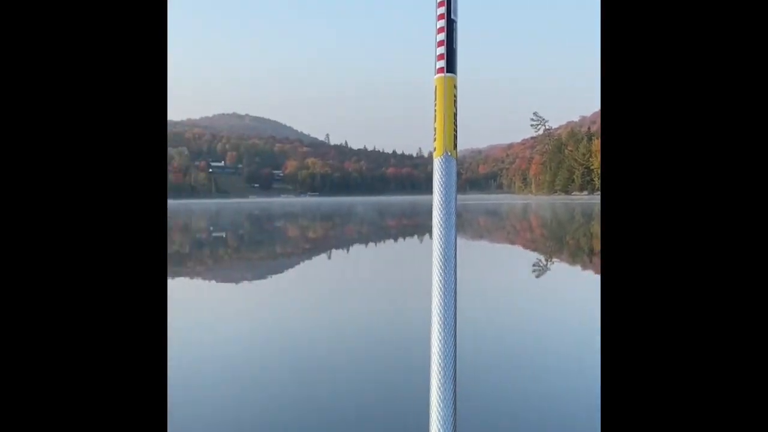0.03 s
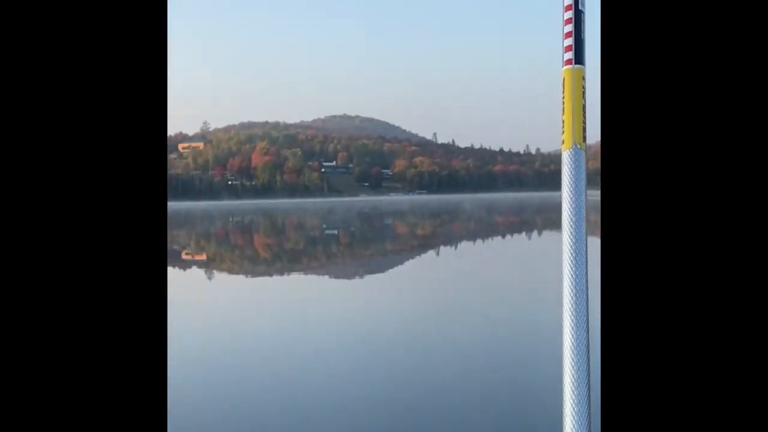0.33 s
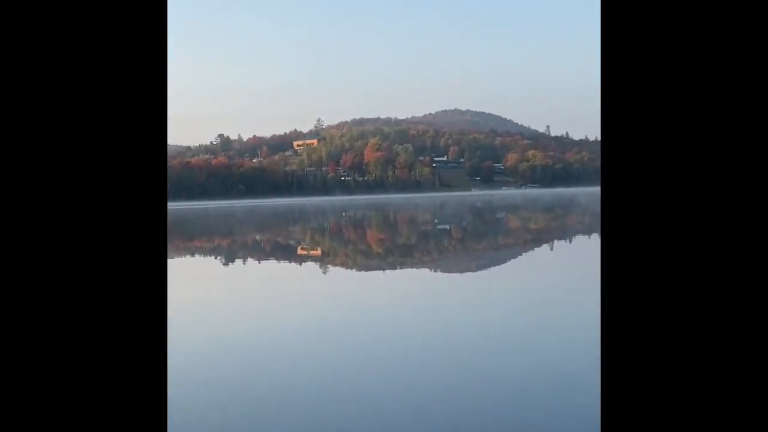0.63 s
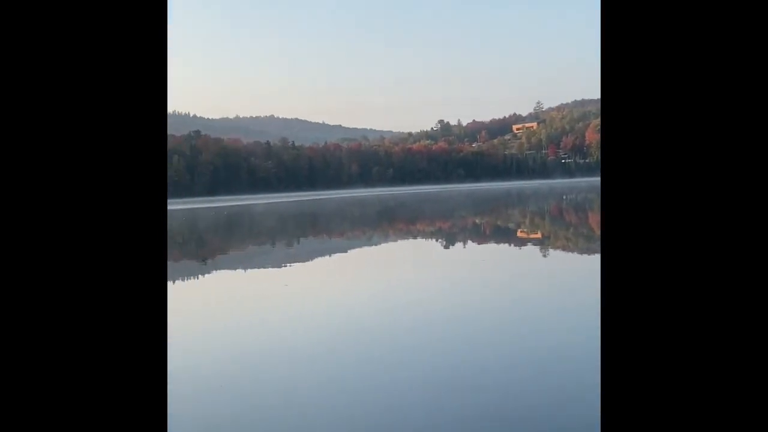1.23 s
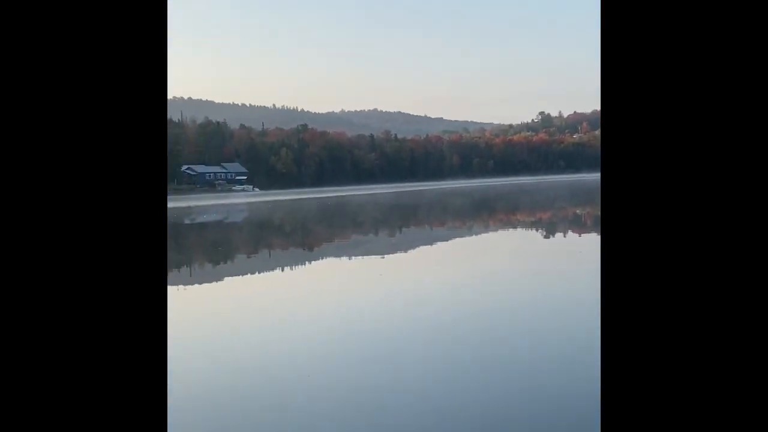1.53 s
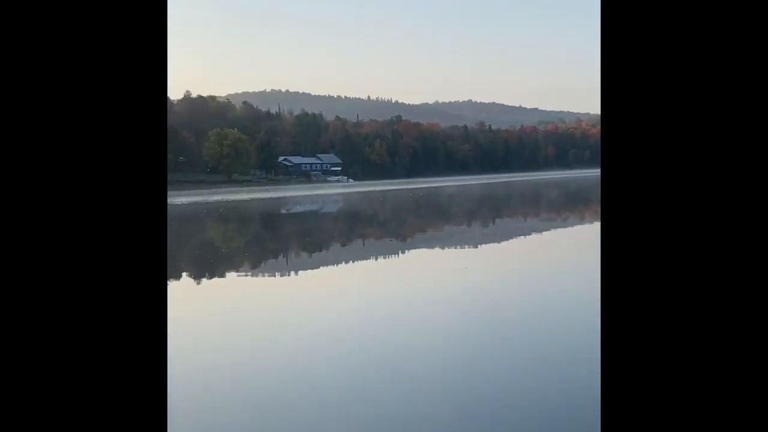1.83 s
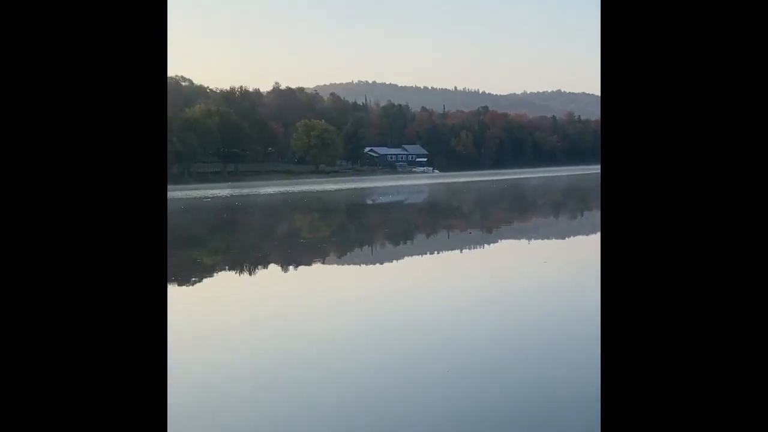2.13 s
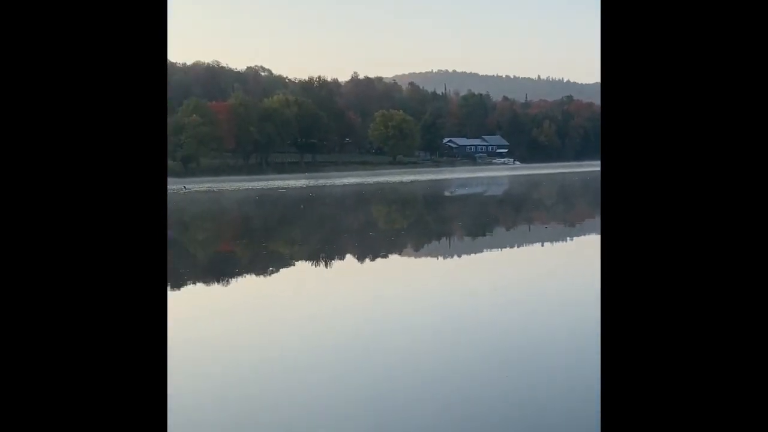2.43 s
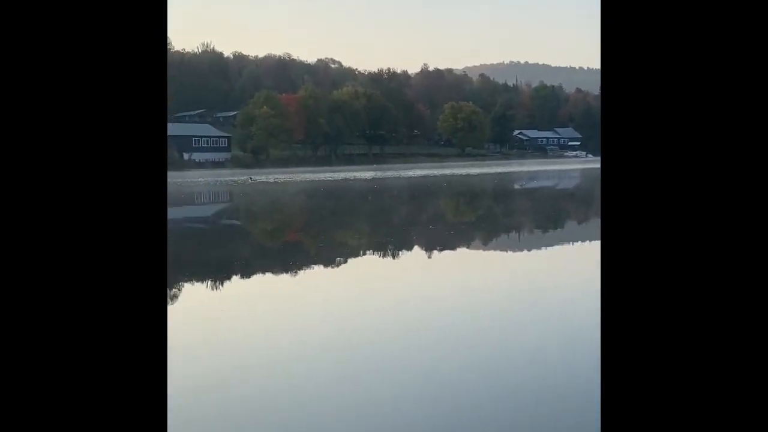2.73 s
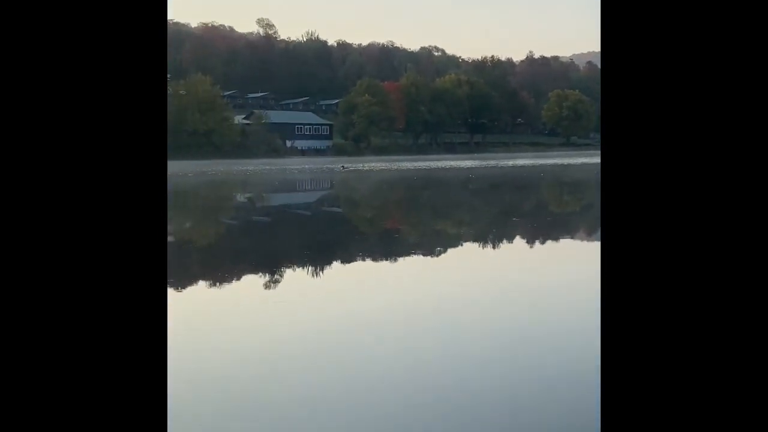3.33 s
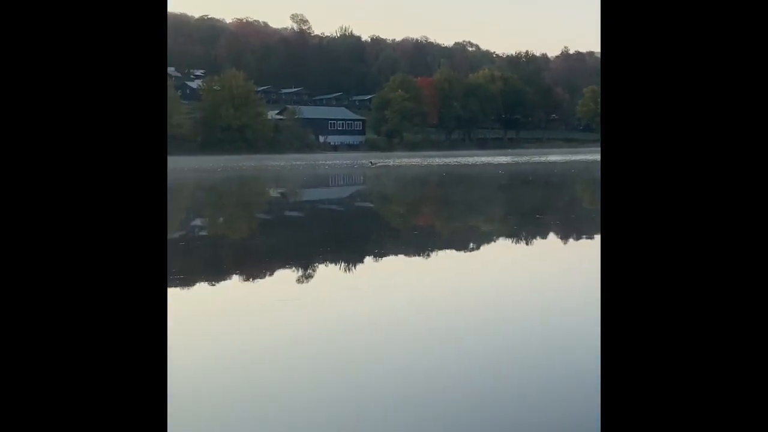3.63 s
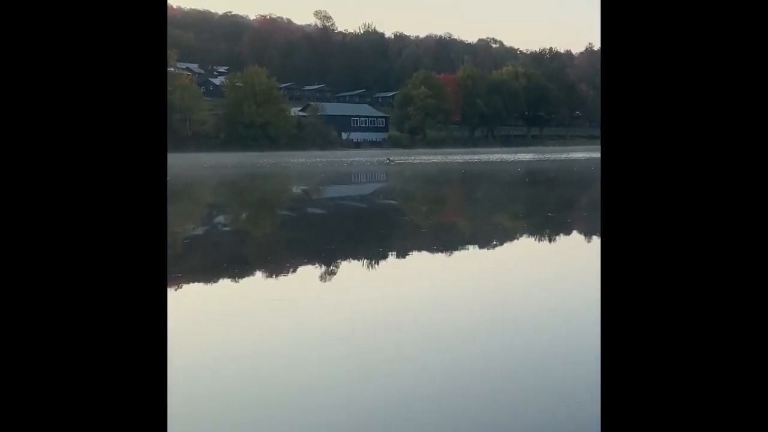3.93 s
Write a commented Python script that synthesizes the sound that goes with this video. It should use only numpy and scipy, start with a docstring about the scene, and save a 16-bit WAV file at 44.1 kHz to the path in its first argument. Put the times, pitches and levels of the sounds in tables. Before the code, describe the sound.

A loon gives one wavering, echoing call across a calm lake, over soft microphone rumble.

```python
"""A calm lake with wooded shores, heard through a hand-held stereo microphone.
Out on the water a loon gives one wavering call; its voice cracks upward once in the middle,
and the trees send back a long soft echo. Just before it a bird calls faintly far away,
after a songbird's thin whistle. Right at the microphone, as it is swung round,
the hand makes it rumble, bump and tick, and skin rubs on the case."""
import sys
import numpy as np
from scipy import signal
from scipy.fft import rfft, irfft
from scipy.io import wavfile
from scipy.ndimage import uniform_filter1d

SR = 44100
rng = np.random.default_rng(int(sys.argv[2]) if len(sys.argv) > 2 else 0)


def store_wav(level_fs):
    """Save 16-bit WAV to argv[1]."""
    pcm = np.round(np.clip(np.atleast_2d(level_fs), -1, 1) * 32767)
    wavfile.write(sys.argv[1], SR, pcm.T.astype(np.int16))


N = 176400
TIME = np.arange(N) / SR

def undb(db):
    return 10 ** (np.asarray(db) / 20)

def curve(rows, col=1):
    """One column of a table, joined by straight lines in time."""
    rows = np.array(rows)
    return np.interp(TIME, rows[:, 0], rows[:, col])

def gain_at(spectrum, hz):
    """Gain of a (f/Hz, level/dB) spectrum at the given frequencies."""
    f, db = np.array(spectrum).T
    return undb(np.interp(np.log(np.maximum(hz, 1)), np.log(f), db))

def coloured(x, spectrum):
    """Filter a sound by a spectrum."""
    return irfft(rfft(x, 2 * N) * gain_at(spectrum, np.fft.rfftfreq(2 * N, 1 / SR)))[..., :N]

def noise(spectrum):
    """Noise of rms 1 with the given spectrum."""
    x = irfft(rfft(rng.standard_normal(N)) * gain_at(spectrum, np.fft.rfftfreq(N, 1 / SR)), N)
    return x / x.std()

def wide(spectrum, side):
    """Stereo noise with a share that differs between left and right."""
    return noise(spectrum) + side * noise(spectrum) * np.array([[1], [-1]])

def walk(per_s):
    """Smooth random wander with spread 1."""
    step = max(int(SR / per_s), 1)
    x = uniform_filter1d(np.repeat(rng.standard_normal(N // step + 1), step), step)[:N]
    return x / x.std()

def dying(t60, t=TIME):
    """A fall of 60 dB in t60 seconds."""
    return np.exp(-np.log(1000) * t / t60)

def scatter(x, envelope, side=0.18):
    """Countless small reflections from trees, with the given envelope in time."""
    mid, difference = rng.standard_normal((2, N)) * envelope / np.linalg.norm(envelope)
    reflections = mid + side * difference * np.array([[1], [-1]])
    return signal.fftconvolve(x.mean(axis=0)[None], reflections, axes=1)[:, :N]

# Air over the lake, all round the microphone: f/Hz, relative level/dB
AIR_SPECTRUM = [(100, -10.5), (400, 0.5), (800, -10.5), (1200, -13), (2000, -22.5), (4000, -27.5),
                (7000, -29.5), (13000, -38.5)]
def still_air(level_db=-74.5, swell_db=0.6):
    """A wide, quiet hush that swells slightly."""
    return undb(level_db + swell_db * walk(4)) * wide(AIR_SPECTRUM, side=0.78)

# Fifth to ninth harmonic at the voice's source: relative level/dB
UPPER_HARMONICS = [7, -0.5, -5.5, -9.5, -15]
# Throat colour of the overtones: f/Hz, gain/dB
THROAT_COLOUR = [(850, 3), (1700, -1), (1950, -25), (2200, -19), (2480, -30.5), (2800, -23.5), (3100, -31),
                 (3500, -20), (3850, -25.5), (4700, -19.5), (5200, -21.5), (5750, -19.5), (6600, -22.5),
                 (7200, -33)]
# Lean of a voice at the microphone: f/Hz, left minus right/dB
STEREO_LEAN = [(600, -7), (850, -4), (1100, 2.5), (1700, -0.5), (4000, 0)]
def voice(rows, harmonics=9, fade_s=0.0025, brightest_s=1.952):
    """One bird note: a fundamental and throat-shaped overtones, with a little rasp."""
    gate = np.clip(np.minimum(TIME - rows[0][0], rows[-1][0] - TIME) / fade_s + .5, 0, 1)
    jitter = 1 + 0.003 * walk(300)
    hz = uniform_filter1d(curve(rows), size=440) * jitter
    rasp = undb(-36) * walk(900)
    phase = 2 * np.pi * np.cumsum(hz) / SR + rasp
    on, out = gate > 0, np.zeros((2, N))
    base_db, overtone_db, hz = curve(rows, 2)[on], curve(rows, 3)[on], hz[on]
    tilt_db_per_octave = -100.5 * (TIME[on] - brightest_s) ** 2
    for k, source_db in enumerate(([0] * 4 + list(UPPER_HARMONICS))[:harmonics], 1):
        high = k > 2
        flutter = undb((2.5 if high else 0.5) * walk(90)[on])
        if k == 1:
            level = undb(base_db)
        else:
            level = undb(overtone_db + source_db + tilt_db_per_octave * np.log2(k / 2))
            level *= gain_at(THROAT_COLOUR, k * hz)
        turbulence_rad = high * 0.17 * walk(700)[on]  # unsteady airflow roughens high overtones
        partial = np.sqrt(2) * np.sin(k * phase[on] + turbulence_rad)
        lean = np.sqrt(gain_at(STEREO_LEAN, k * hz))
        out[:, on] += level * flutter * gate[on] * partial * np.array([lean, 1 / lean])
    return out

# Whistle in the trees: t/s, f/Hz, fundamental level/dB, overtone level/dB (not sounded)
SONGBIRD_NOTE = [(.25, 5150, -99, -110), (.50, 5500, -102, -110)]
def songbird():
    """A thin rising whistle that arrives only as scatter from the trees."""
    return scatter(voice(SONGBIRD_NOTE, harmonics=1, fade_s=0.03), dying(t60=0.42))

# Call from across the lake, before colouring: t/s, f/Hz, fundamental level/dB, overtone level/dB
FAR_NOTE = [(.938, 700, -91, -76), (.985, 797, -91.5, -75), (1.035, 689, -86.5, -74),
            (1.06, 688, -88.5, -86)]
# Dulling over that distance: f/Hz, gain/dB
DISTANCE_COLOUR = [(800, 6), (1650, -1.5), (2100, -12), (4000, -40)]
def far_bird():
    """One faint note, dulled and smeared by distance."""
    note = coloured(voice(FAR_NOTE, harmonics=2, fade_s=0.016), DISTANCE_COLOUR)
    return note + scatter(note, dying(t60=0.42))

# Skin rubbing on the microphone case: t/s, level/dB
RUB_LEVEL = [(0, -100), (2.6, -84), (2.85, -74), (3.45, -71.5), (3.6, -75), (3.8, -72), (4, -62)]
# Its friction and its fine crackle: f/Hz, relative level/dB
FRICTION_SPECTRUM = [(150, -29), (300, -7), (600, -5.5), (1200, -17.5), (2200, -24), (4000, -43),
                     (8000, -51), (12000, -57.5)]
CRACKLE_SPECTRUM = [(300, -21), (1700, -0.5), (3500, -3.5), (13000, -30.5)]
def rubbing(slips_per_s=410, slip_decay_s=0.0028, patchy_db=4, crackle_db=-18):
    """Uneven friction of skin with tiny slips, growing as the grip shifts."""
    slips = (rng.random(N) < slips_per_s / SR) * undb(3 * np.clip(rng.standard_normal(N), -2, 2))
    envelope = signal.lfilter([1], [1, -np.exp(-1 / (slip_decay_s * SR))], slips)
    crackle = coloured(envelope * rng.standard_normal(N), CRACKLE_SPECTRUM)
    level = undb(curve(RUB_LEVEL) + patchy_db * walk(45))
    return level * (wide(FRICTION_SPECTRUM, side=0.97) + undb(crackle_db) * crackle / crackle.std())

# Fingers on the case: t/s, relative peak level/dB, ring f/Hz, crack against ring/dB
FINGER_TICKS = [(.135, -67, 4600, -4), (.263, -66.5, 1600, 2), (0.4924, -73.5, 5650, -11),
                (1.052, -62.5, 1290, -4.5), (1.1438, -71, 4140, -15), (1.1917, -70.5, 6060, -19),
                (1.415, -73, 2040, -17.5), (1.5564, -71, 2380, 0), (1.657, -66.5, 3070, -2),
                (2.5375, -63, 11300, -4), (2.5706, -64.5, 5025, 1), (2.648, -72.5, 5274, -18),
                (2.771, -65.5, 2310, -13), (2.8145, -66, 2265, -8), (2.8613, -59.5, 2231, -4.5),
                (2.881, -69.5, 5477, -23), (3.1608, -61, 3320, 4), (3.3005, -72.5, 5520, -1),
                (3.3311, -63.5, 2328, 0), (3.3877, -60.5, 3156, -6), (3.6451, -69, 3700, -10),
                (3.7419, -68.5, 7740, -24), (3.751, -66.5, 2030, -18), (3.761, -67.5, 8600, -21),
                (3.789, -52, 582, -34), (3.836, -73, 5140, -12), (3.887, -55, 1727, 0),
                (3.918, -60, 1630, -4), (3.9815, -55.5, 1500, 15)]
def ticks(rise_s=0.0012, ring_s=0.0054, crack_s=0.0028, ring_width=0.045):
    """Tiny clicks of the fingers: a broad crack and a brief ring of the case."""
    size = 4096
    t, f, out = TIME[:size], np.fft.rfftfreq(size, 1 / SR), np.zeros(N + size)
    for start, db, hz, crack_db in FINGER_TICKS:
        ring = irfft(rfft(rng.standard_normal(size)) / (1 + ((f / hz - 1) / ring_width) ** 2))
        crack = irfft(rfft(rng.standard_normal(size)) / (1 + (f / (2 * hz)) ** 2))
        tick = ring / ring.std() * (1 - np.exp(-t / rise_s)) * np.exp(-t / ring_s)
        tick += undb(crack_db) * crack / crack.std() * np.exp(-t / crack_s)
        i = int(start * SR)
        out[i:i + size] += undb(db) * tick / np.abs(tick).max()
    return out[:N]

# Handling rumble at the microphone: t/s, relative bass level/dB, low-middle level/dB
RUMBLE_LEVELS = [(0.0, -45.5, -65.5), (0.36, -52, -62), (0.43, -50.5, -52.5), (0.5, -50.5, -62),
                 (0.71, -45, -61), (0.92, -48.5, -67), (1.15, -38.5, -56.5), (1.27, -39, -63.5),
                 (1.3, -33, -49), (1.38, -34.5, -65), (1.51, -38.5, -47.5), (1.58, -48.5, -61),
                 (2.31, -52.5, -60), (2.37, -58, -70.5), (2.68, -51.5, -67.5), (2.87, -36, -51.5),
                 (2.95, -43.5, -63), (3.16, -41, -54.5), (3.19, -50.5, -64), (3.4, -39.5, -57),
                 (3.46, -49.5, -64), (3.66, -41, -54.5), (4.0, -44.5, -49)]
# Its two bands: f/Hz, relative level/dB
BASS_SPECTRUM = [(15, -26), (30, -15.5), (50, 4.5), (72, 1), (105, -2.5), (135, -11), (220, -38.5),
                 (4000, -110)]
LOW_MID_SPECTRUM = [(90, -18.5), (140, 0.5), (200, -1.5), (300, -9), (420, -24.5), (800, -48.5),
                    (8000, -100)]
def rumble():
    """The moving hand shakes the microphone."""
    bass = undb(curve(RUMBLE_LEVELS) - 1.5) * wide(BASS_SPECTRUM, side=0.09)
    low_mid = undb(curve(RUMBLE_LEVELS, 2)) * wide(LOW_MID_SPECTRUM, side=0.25)
    return bass + low_mid

# The hand knocking on the case: t/s, relative level/dB, f/Hz
HAND_BUMPS = [(0.402, -48, 199), (1.082, -28.5, 67.5), (1.185, -26, 87), (1.295, -26.5, 138.5),
              (1.408, -29.5, 124), (1.498, -21.5, 127), (1.641, -37.5, 182), (1.787, -31.5, 158.6),
              (2.302, -37.5, 69.4), (2.538, -39.5, 88.9), (2.576, -35, 80.3), (2.803, -29, 64.5),
              (3.146, -35.5, 133.3), (3.648, -29, 102), (3.782, -32.5, 194.9), (3.933, -39, 277.6)]
def bumps(cycles_to_peak=0.6):
    """Soft knocks: a few heavily damped low cycles each."""
    out = np.zeros(N)
    for start, db, hz in HAND_BUMPS:
        cycles = np.maximum(TIME - start, 0) * hz
        age = cycles / cycles_to_peak
        out += undb(db) * (age * np.exp(1 - age)) ** 2 * np.sin(2 * np.pi * cycles)
    return out

# What the far and the near shore send back: f/Hz, relative gain/dB
FAR_SHORE_COLOUR = [(500, 1.5), (800, -5), (1100, -5), (1400, 2.5), (1700, -4.5), (2300, -3), (4000, -38.5)]
NEAR_SHORE_COLOUR = [(1700, -24), (3000, -13.5)]
def shores(call, delay_s=0.45, rise_s=0.04, echo_t60_s=4.3, echo_db=-18):
    """Trees scatter the call: a faint near wash, then the long echo of the far shore."""
    late = np.maximum(TIME - delay_s, 0)
    envelope = (1 - np.exp(-late / rise_s)) * dying(echo_t60_s, late)
    echo = undb(echo_db) * coloured(scatter(call, envelope), FAR_SHORE_COLOUR)
    wash = coloured(scatter(call, dying(t60=0.23)), NEAR_SHORE_COLOUR)
    return wash + echo

# The loon out on the water: t/s, f/Hz, fundamental level/dB, overtone level before colouring/dB
HOARSE_START = [(1.668, 395.3, -66.5, -79), (1.685, 419, -62, -66), (1.720, 456, -59.5, -66)]
WAVERING_HALVES = [
    [(1.728, 695, -68, -63.5), (1.736, 705, -49.5, -58.5), (1.758, 796, -42, -47.5),
     (1.778, 811, -40, -48.5), (1.82, 663.6, -48, -62.5), (1.856, 819.5, -38.5, -41.5),
     (1.878, 828, -40.5, -41.5), (1.894, 795, -40, -47), (1.916, 653, -45, -60.5), (1.93, 655, -48, -56),
     (1.954, 799, -41, -43.5), (1.978, 828, -41, -43.5), (1.989, 838, -44.5, -50)],
    [(2.034, 647, -54.5, -54.5), (2.046, 647, -46, -58.5), (2.062, 753, -43, -46.5),
     (2.076, 777, -39.5, -42), (2.092, 770, -40, -47), (2.13, 600, -51.5, -59.5), (2.16, 617.6, -52.5, -62),
     (2.194, 685, -46.5, -50.5), (2.22, 658, -50.5, -55), (2.238, 594.5, -51, -60.5),
     (2.284, 574, -57, -74.5), (2.302, 526, -65, -99), (2.31, 537.7, -75.5, -71.5)],
]
REGISTER_CRACK = [(1.991, 1190, -46, -65), (1.997, 1076, -34, -47), (2.004, 969, -34.5, -51.5),
                  (2.016, 879, -38.5, -63.5), (2.035, 875, -46.5, -89)]
def loon():
    """A low hoarse start, then a wavering call split by a nearly pure crack into the upper register."""
    first, second = WAVERING_HALVES
    return (voice(HOARSE_START, harmonics=3) + voice(first)
            + voice(REGISTER_CRACK, harmonics=2) + voice(second))

def scene(bump_db=-1, tick_db=2):
    """The lake and its birds, with handling noise right at the microphone."""
    air = still_air()
    call = loon()
    lake = air + call + shores(call) + far_bird() + songbird()
    handling = rumble() + undb(bump_db) * bumps() + undb(tick_db) * ticks() + rubbing()
    return lake + handling

def record(dry, lag_s=0.00003, port_hz=4995, port_width_hz=390, top_hz=13000):
    """The right port hears slightly late and turns the phase at its resonance; the top is cut off."""
    f = np.fft.rfftfreq(2 * N, 1 / SR)
    samples_from_edge = np.minimum(np.arange(N), np.arange(N)[::-1])
    left, right = dry * np.minimum(samples_from_edge / 200, 1)
    turn_rad = 2 * np.pi * f * lag_s + 2 * np.arctan2(f * port_width_hz, port_hz ** 2 - f ** 2)
    right = irfft(rfft(right, 2 * N) * np.exp(-1j * turn_rad))[:N]
    lowpass = signal.ellip(8, .2, 70, top_hz, fs=SR, output="sos")
    return signal.sosfilt(lowpass, np.array([left, right]))

dry = scene()
out = record(dry)
store_wav(out)
```